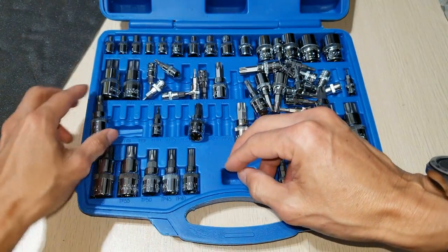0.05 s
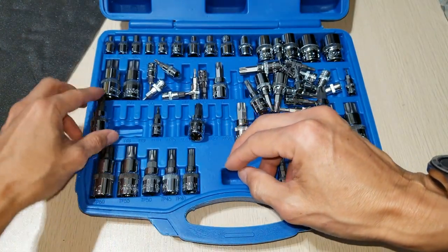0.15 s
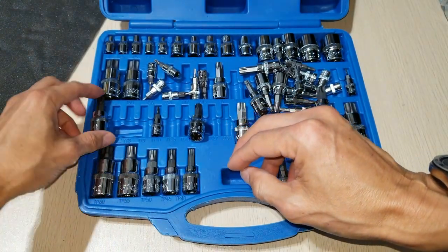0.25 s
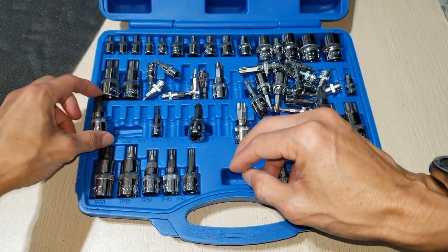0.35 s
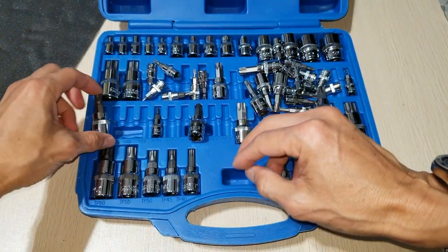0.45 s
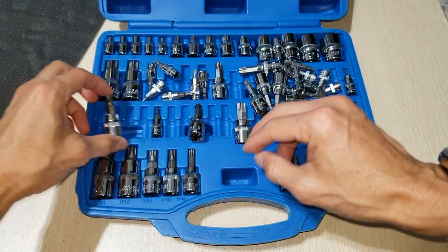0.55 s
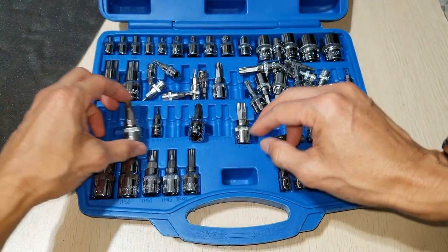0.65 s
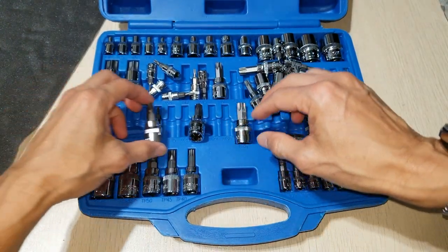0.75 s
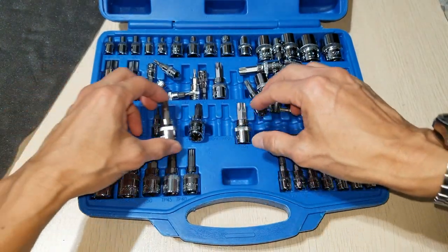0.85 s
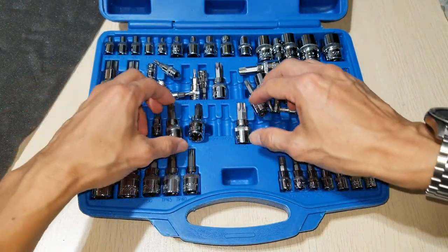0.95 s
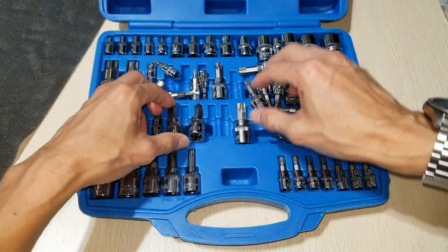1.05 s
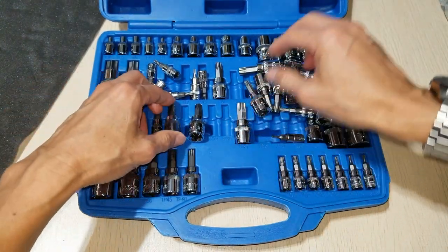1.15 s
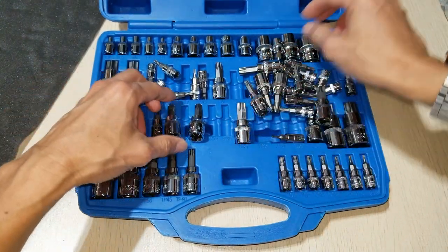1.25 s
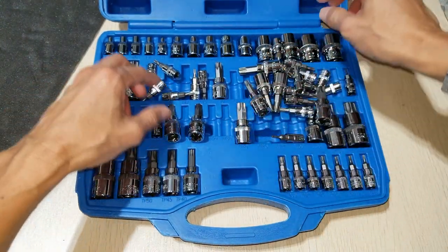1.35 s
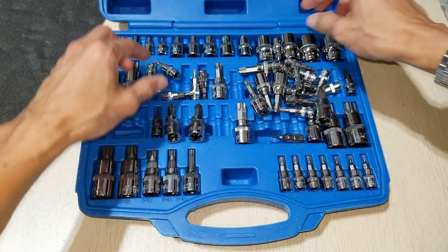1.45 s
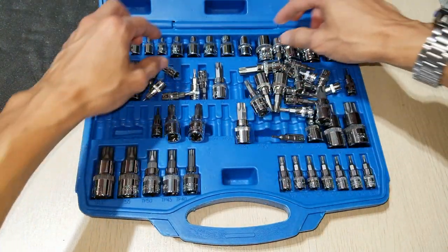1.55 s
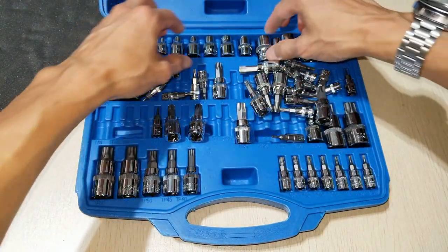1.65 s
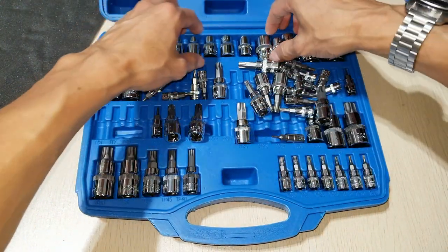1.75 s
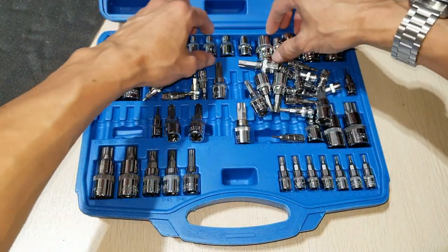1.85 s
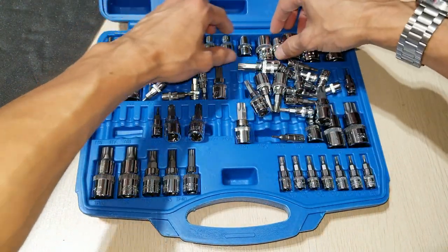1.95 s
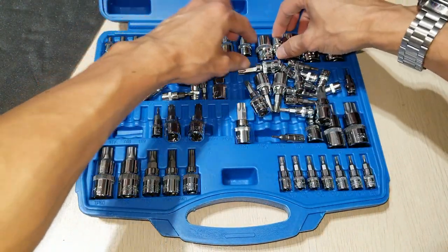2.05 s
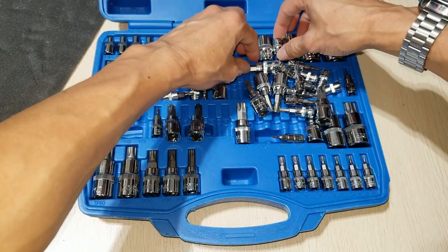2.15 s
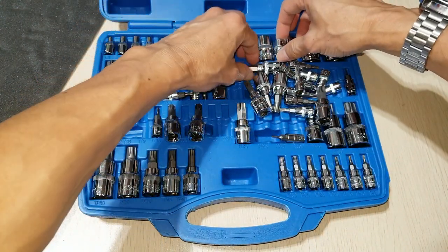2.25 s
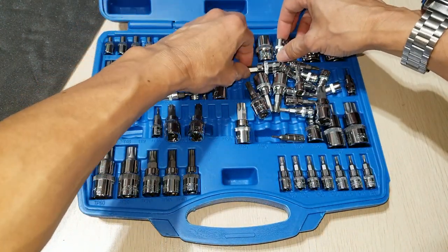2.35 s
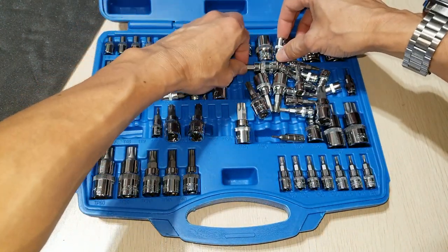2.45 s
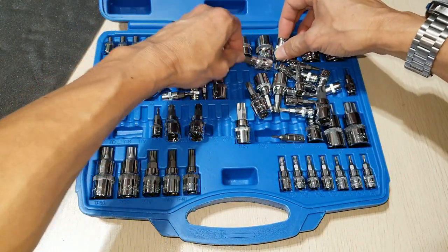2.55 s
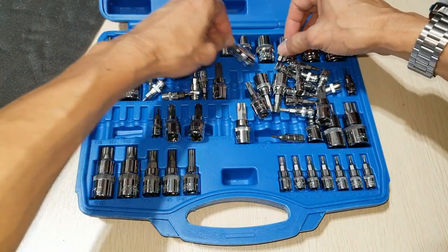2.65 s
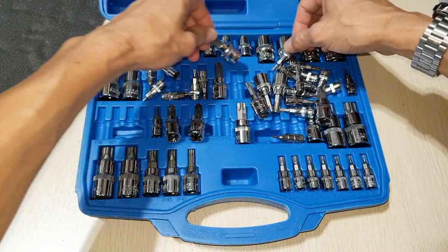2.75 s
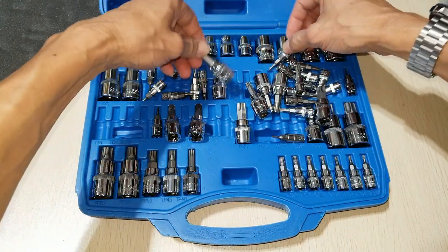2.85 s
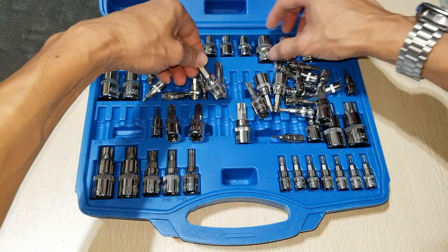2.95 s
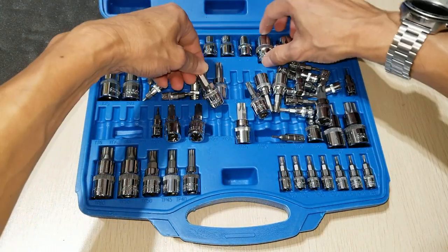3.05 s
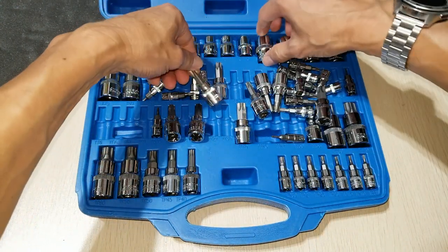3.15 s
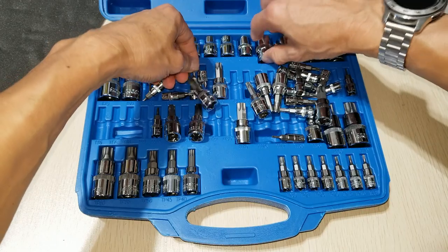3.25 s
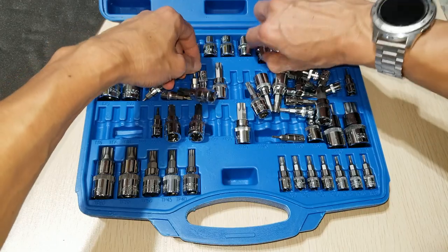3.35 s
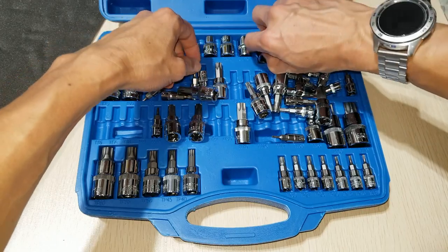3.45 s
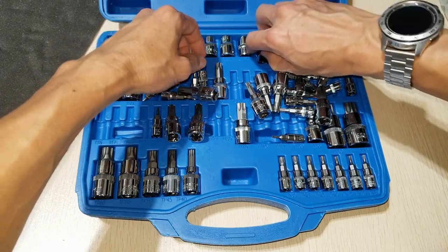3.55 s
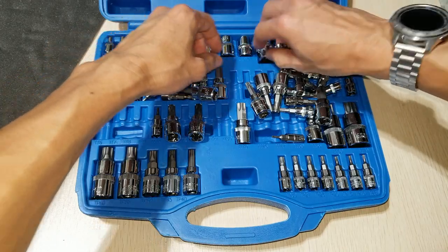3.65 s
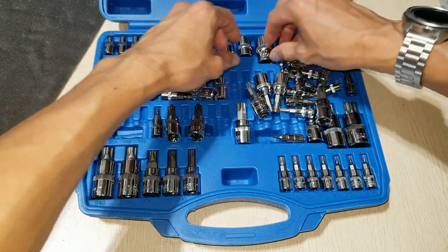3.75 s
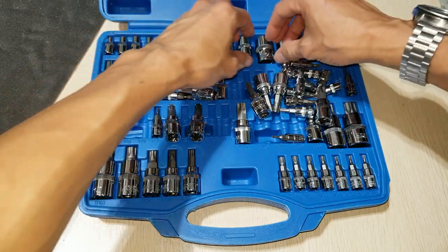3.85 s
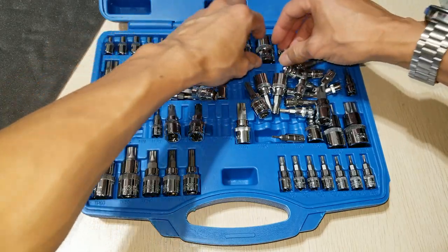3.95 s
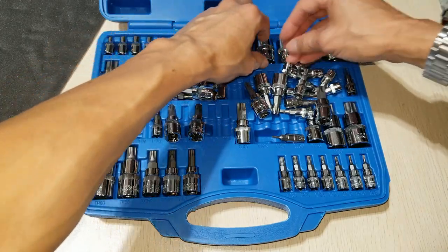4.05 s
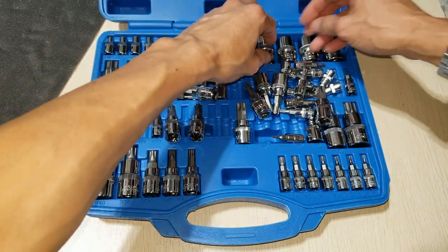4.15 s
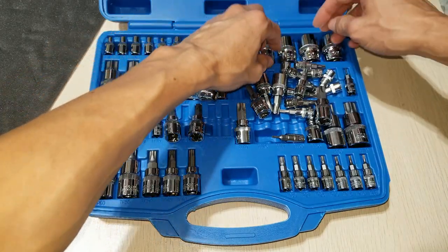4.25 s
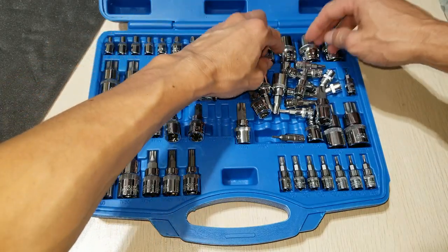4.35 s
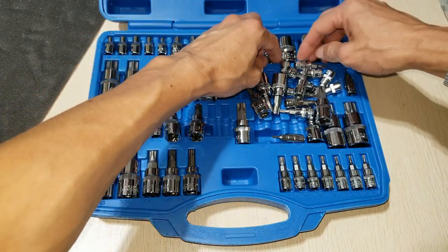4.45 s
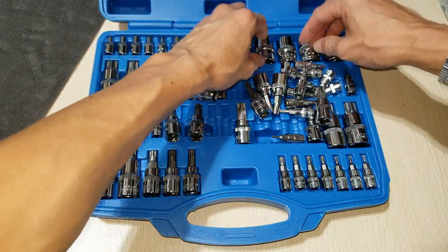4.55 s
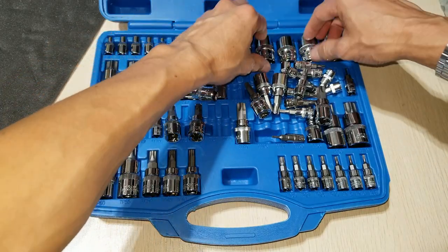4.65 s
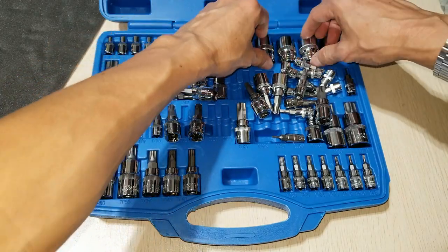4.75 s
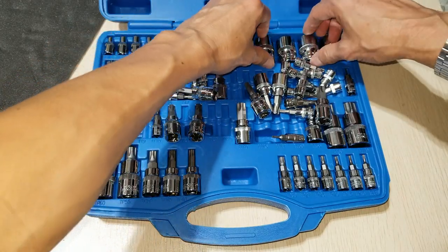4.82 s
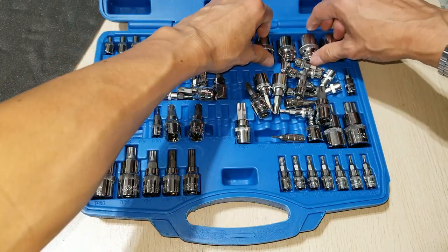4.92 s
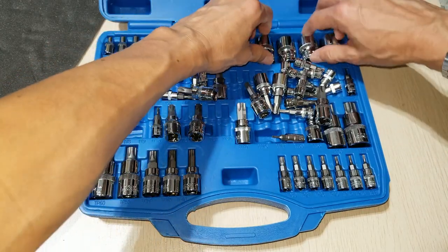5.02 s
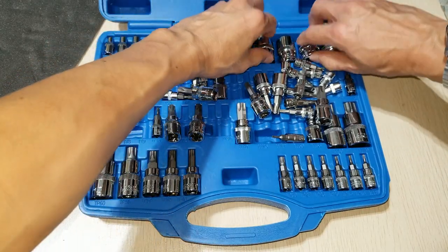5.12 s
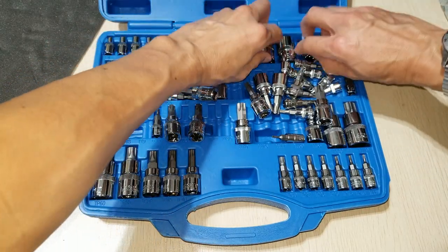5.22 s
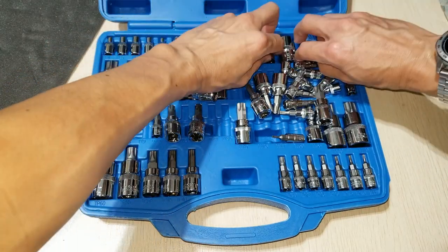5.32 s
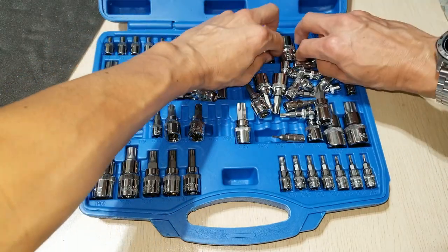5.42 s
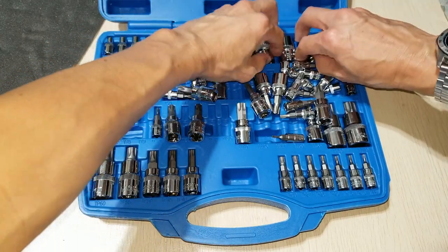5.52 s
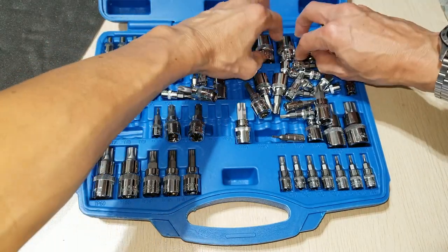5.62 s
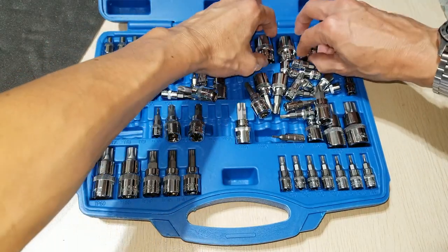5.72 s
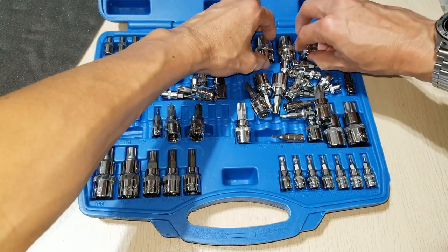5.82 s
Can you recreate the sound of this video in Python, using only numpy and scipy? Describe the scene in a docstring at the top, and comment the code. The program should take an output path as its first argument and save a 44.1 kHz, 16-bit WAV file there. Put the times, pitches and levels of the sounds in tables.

```python
"""Sorting steel sockets and bits in a plastic tool case

Two hands sort pieces in a moulded case on a table, heard close. Each contact is shaped noise in four bands
(table thump, tray knock, clack, tick) plus short partials; three small bits ring as very high sines.
Dragged or settling pieces chatter and rub as filtered noise, a finger slides over the plastic, a socket
squeaks, and decaying noise tails give a small room over soft hiss."""
import sys
import numpy as np
from scipy import signal
from scipy.fft import rfft, irfft, next_fast_len
from scipy.io import wavfile

SR = 44100
rng = np.random.default_rng(int(sys.argv[2]) if len(sys.argv) > 2 else 0)


def store_pcm(level_fs):
    """Save levels as 16-bit WAV."""
    pcm = np.round(np.clip(level_fs, -1, 1) * 32767).astype(np.int16)
    wavfile.write(sys.argv[1], SR, np.atleast_2d(pcm).T)


N = 259308
SIZE = 8192  # samples in one event or response
T = np.arange(SIZE) / SR
HZ = np.fft.rfftfreq(SIZE, 1 / SR)
NOW = np.arange(N) / SR


def amp(db):
    """dB to amplitude."""
    return 10 ** (np.asarray(db) / 20)


def unit(x):
    """Scale to rms 1."""
    return x / np.sqrt(np.mean(x ** 2) + 1e-20)


def noise_pair():
    """Two unrelated white noises."""
    return rng.standard_normal((2, N))


def along(points, hz):
    """(Hz, value) points read on a log frequency axis."""
    f, v = np.transpose(points)
    return np.interp(np.log(hz + 1), np.log(f + 1), v)


def swell(rows):
    """(s, dB) points as a gain for every sample, silent outside them."""
    s, db = np.transpose(rows)
    return amp(np.interp(NOW, s, db, left=-np.inf, right=-np.inf))


def fade(t60_s):
    """Exponential free decay, 60 dB in t60_s."""
    return np.exp(-np.log(1000) * T / t60_s)


def onset(rise_s):
    """Exponential rise with time constant rise_s."""
    return 1 - np.exp(-T / rise_s)


def add(track, s, sound):
    """Mix a sound in at a time."""
    part = track[:, max(round(s * SR), 0):][:, :sound.shape[1]]
    part += sound[:, :part.shape[1]]


def peaks(modes):
    """Power response of a set of resonances."""
    return sum(amp(db) ** 2 / (1 + (2 * (HZ - hz) / width) ** 2) for hz, width, db in modes)


# Resonances of the loaded case. Each row: frequency in Hz, width in Hz, level in dB above its dense modes.
CASE_MODES = [(81.4, 8.2, 16), (137.9, 20, 10), (412.4, 41, 9.5), (523, 110, 9), (696, 25, 5.5),
              (940, 30, 7.5), (1039, 74, 4.5), (1172, 95, 6), (1926, 244, 8), (2077, 70, 1.5),
              (2860, 150, -0.5), (3800, 51, -8), (4063, 47, 4), (6560, 750, 4)]


def through_case(spectrum):
    """Causal (minimum-phase) response of the case to a force with this spectrum."""
    magnitude = amp(along(spectrum, HZ)) * np.sqrt(1 + peaks(CASE_MODES))
    cepstrum = irfft(np.log(magnitude))
    # folding the cepstrum onto positive time makes the response causal
    cepstrum[1:SIZE // 2] *= 2
    cepstrum[SIZE // 2 + 1:] = 0
    return np.exp(rfft(cepstrum))


# Stereo likeness. Each row: frequency in Hz, left-right correlation (1 = identical).
LIKENESS = [(60, .95), (280, .99), (550, .91), (1100, .68), (2200, .25), (5000, .04)]
# Stereo balance. Each row: frequency in Hz, left over right in dB.
LEFT_OVER_RIGHT = [(60, 5.5), (300, 3.5), (700, 3.5), (2500, 4), (5000, -1), (9000, 5.5)]


def ports(pair, response):
    """Two unrelated spectra become left and right: alike in the bass, mostly louder on the left."""
    turn = np.arccos(np.clip(along(LIKENESS, HZ), -1, 1)) / 2
    lean = amp(np.outer([.5, -.5], along(LEFT_OVER_RIGHT, HZ)))
    mid = pair[..., :1, :] * np.cos(turn)
    side = pair[..., 1:, :] * np.sin(turn)
    return np.concatenate([mid + side, mid - side], axis=-2) * lean * response


def sustained(force, response):
    """A lasting pair of forces heard through a response, at rms 1."""
    paths = irfft(ports(np.eye(2)[:, :, None], response))
    paths = np.roll(paths, SIZE // 2, axis=-1)
    heard = signal.oaconvolve(force[:, None], paths, axes=-1).sum(axis=0)
    return unit(heard[:, SIZE // 2:][:, :N])


def pings(times, gains, count, low_hz, high_hz, t60_s, octave_db):
    """Held in fingers or seats, pieces give a few short partials, different at every touch."""
    track, t = np.zeros((2, N)), T[:SIZE // 2]
    shape = (fade(t60_s) * onset(0.00044))[:len(t)]
    for s, gain in zip(times, gains):
        hz = low_hz * (high_hz / low_hz) ** rng.random((count, 1))
        ring = np.sin(2 * np.pi * (hz * t + rng.random((2, count, 1))))
        ring = ring * amp(octave_db * np.log2(hz / low_hz))
        add(track, s, gain * ring.sum(axis=1) * shape)
    return track


# Spectrum of the room and microphone hiss. Each row: frequency in Hz, level in dB.
QUIET_SPECTRUM = [(15, -22), (25, -10.5), (59, -3.5), (178, -8.5), (281, -11), (1080, -18), (1900, -15),
                  (2630, -19), (8580, -30.5), (10900, -15), (15500, -22.5)]


def background(level_db=-59, hiss_hz=1900, hiss_width_hz=350, hiss_db=6):
    """A quiet room: steady shaped noise with a soft mid-range hiss."""
    hiss = np.sqrt(0.5 + peaks([(hiss_hz, hiss_width_hz, hiss_db)]))
    return amp(level_db) * sustained(noise_pair(), amp(along(QUIET_SPECTRUM, HZ)) * hiss)


# Finger slide over textured plastic. Each row: time in seconds, level in dB.
SLIDE_LEVEL = [(.36, -71.5), (.46, -48), (.54, -44.5), (.68, -50), (.75, -74.5)]
# Spectrum of the slide. Each row: frequency in Hz, level in dB.
SKIN_SPECTRUM = [(35, -48), (60, -30), (123, -9.5), (175, -25.5), (403, -3.5), (773, -23.5), (869, -14),
                 (1200, -26), (1550, -14.5), (3420, -28.5), (15500, -23)]


def finger_slide():
    """Skin on textured plastic: smooth friction as shaped noise."""
    return swell(SLIDE_LEVEL) * sustained(noise_pair(), amp(along(SKIN_SPECTRUM, HZ)))


# Socket pulled along its seat. Each row: time in seconds, level in dB.
PULL_LEVEL = [(2.44, -67.5), (2.5, -50), (2.62, -56), (2.655, -34.5), (2.68, -61)]
# Resonances of the squeak. Each row: frequency in Hz, width in Hz, level in dB.
SQUEAK_MODES = [(2900, 63, 0), (6900, 220, -5.5)]


def socket_squeak():
    """Friction on the seat, as noise through two narrow resonances."""
    return swell(PULL_LEVEL) * sustained(noise_pair(), np.sqrt(peaks(SQUEAK_MODES)))


# Strokes that drag a piece over tray and neighbours.
# Each row: start in seconds, end in seconds, push at the start in dB, push at the end in dB.
STROKES = [(1.79, 1.993, -55, -43.5), (2.05, 2.28, -32, -26.5), (2.825, 2.982, -33.5, -21),
           (3.249, 3.382, -25.5, -28.5), (3.46, 3.495, -32.5, -33), (3.724, 3.906, -39, -23),
           (3.975, 4.098, -41.5, -38), (4.32, 4.452, -49.5, -48), (4.745, 5.045, -51.5, -48.5),
           (5.048, 5.259, -21, -29.5), (5.298, 5.358, -38, -34.5), (5.838, 5.884, -31, -28)]
# Soft swell into each strike, and rattle after it: dB against the clack, t60.
SWELL_DB, SWELL_T60_S = -14, .035
SETTLE_DB, SETTLE_T60_S = -13, .22


def pushing(attack_s=.011, release_s=.014, settle_rise_s=.012):
    """Drive of the friction: in each stroke, with a soft swell into each contact and a rattle after it."""
    push = np.zeros((1, N))
    for start, end, start_db, end_db in STROKES:
        gate = np.clip((NOW - start) / attack_s, 0, 1) * np.exp(-np.maximum(NOW - end, 0) / release_s)
        push += gate * amp(np.interp(NOW, [start, end], [start_db, end_db]))
    lead_in = fade(SWELL_T60_S)[SIZE // 2::-1]  # reversed decay softens the start of the strike
    settling = fade(SETTLE_T60_S) * onset(settle_rise_s)
    for (s, *_), db in zip(CONTACTS, part_db(CLACK_LAW)):
        add(push, s - len(lead_in) / SR, amp(db + SWELL_DB) * lead_in[None])
        add(push, s, amp(db + SETTLE_DB) * settling[None])
    return push[0]


# Hard chatter fed into the case. Each row: frequency in Hz, level in dB.
CHATTER_FORCE = [(60, -22.5), (200, -6.5), (700, -12.5), (1900, 0.5), (3500, -7.5), (8000, -22),
                 (15000, -23)]
# Light rubbing fed into the case. Each row: frequency in Hz, level in dB.
RUB_FORCE = [(100, -10.5), (600, -10), (1400, -0.5), (2500, -0.5), (6000, -13.5), (15000, -22.5)]


def drags(slips_per_s=260, spread_db=3, slip_t60_s=0.026, bed=0.3, catch_db=-37,
          rub_db=-1, chatter_db=-2.0, ping_db=-3):
    """Lightly pushed steel rubs; pushed harder it catches and slips, and more of the slips ping."""
    push = pushing()
    catching = push ** 2 / (push ** 2 + amp(catch_db) ** 2)
    slip_gain = amp(spread_db * np.clip(rng.standard_normal(N), -2, 2))
    slips = (rng.random(N) < slips_per_s / SR) * slip_gain
    grip = np.sqrt(np.abs(signal.oaconvolve(slips ** 2, fade(slip_t60_s) ** 2)[:N]))
    chatter = sustained(noise_pair() * (unit(grip) + bed), through_case(CHATTER_FORCE))
    rub = sustained(noise_pair() * (unit(grip) + 2), through_case(RUB_FORCE))
    hard_part = amp(chatter_db) * np.sqrt(catching) * chatter
    light_part = amp(rub_db) * np.sqrt(1 - catching) * rub
    hard = (slips > 0) & (rng.random(N) < np.sqrt(catching))
    slip_pings = pings(NOW[hard], amp(ping_db) * (slips * push)[hard], count=1,
                       low_hz=1502, high_hz=4690, t60_s=0.052, octave_db=-2.5)
    return push * (hard_part + light_part) + slip_pings


# Steel striking a bit. Each row: time in seconds, bit name, level in dB.
CLINKS = [(1.604, "low", -28.5), (1.623, "low", -22), (1.683, "low", -20.5), (1.729, "low", -25.5),
          (2.34, "low", -27.5), (2.41, "middle", -24), (2.882, "middle", -19), (3.061, "middle", -24.5),
          (3.196, "low", -0.5), (3.302, "low", -18), (3.38, "middle", -17.5), (3.769, "high", -22),
          (3.817, "high", -15.5), (3.973, "middle", -23.5), (5.208, "high", -16)]
# Bits that ring. Each entry: bit name, pitch in Hz, t60 in seconds.
BITS = {"low": (12480, 0.16), "middle": (12950, 0.072), "high": (13110, 0.062)}
HOP_S, HOP_LOSS_DB = .03, 11.5  # longest flight, loss at each hop


def clinks(room_db=-9, room_t60_s=0.32, side_db=3.0, spread_hz=60, strikes=3):
    """Each bit rings at its own pitch, again at every hop; narrow-band noise adds fluttering reflections."""
    track = np.zeros((2, N))
    for s, bit, db in CLINKS:
        hz, t60_s = BITS[bit]
        band = 1 / (1 + ((HZ - hz) / spread_hz) ** 2)
        flutter = unit(irfft(rfft(rng.standard_normal((2, SIZE))) * band))
        echo = flutter * fade(np.sqrt(t60_s * room_t60_s)) * onset(0.0028)
        add(track, s, amp(db + room_db) * echo)
        for hop in range(strikes):
            phase = rng.uniform(0, 2 * np.pi) + np.array([[0], [np.pi / 2]])
            ring = np.sin(2 * np.pi * hz * T + phase) * fade(t60_s) * onset(.0007)
            add(track, s, amp(db - hop * HOP_LOSS_DB) * ring)
            s += HOP_S * rng.uniform(.5, 1)
    return track * amp([[side_db], [-side_db]])  # left up, right down


def own_colours(slopes_db_per_octave):
    """Gain against frequency for each contact: a slope, and random bumps of the spot that was struck."""
    octaves = np.log2(np.hypot(HZ, 300) / 300)
    knots = np.arange(0, 7, .22)  # octaves
    bumps_db = 2.8 * rng.standard_normal((len(slopes_db_per_octave), len(knots)))
    return amp([np.clip(slope, -6, 6) * octaves + np.interp(octaves, knots, bump)
                for slope, bump in zip(slopes_db_per_octave, bumps_db)])


LEAD_S = .003  # silence in front of each blow


def blows(times, levels_db, slopes, spectrum, rise_s, first_t60_s, body_db, body_t60_s, room_db, room_t60_s):
    """One band of every contact: noise decaying as the blow, the tray's shudder and the room."""
    decay = fade(first_t60_s) + amp(body_db) * fade(body_t60_s) + amp(room_db) * fade(room_t60_s)
    shape = np.interp(T - LEAD_S, T, decay * onset(rise_s))
    force = rng.standard_normal((len(times), 2, SIZE)) * shape
    sounds = irfft(ports(rfft(force) * own_colours(slopes)[:, None], through_case(spectrum)))
    sounds = sounds * np.clip((T[-1] - T) / .06, 0, 1) ** 2  # taper to silence
    track = np.zeros((2, N))
    for s, db, sound in zip(times, levels_db, sounds):
        # 0 dB: the energy of 10 ms at rms 1
        add(track, s - LEAD_S, amp(db) * unit(sound) * np.sqrt(.01 * SR / SIZE))
    return track


USUAL_STRENGTH_DB = -25


def part_db(law):
    """Level of one part of every contact, linear in the strength and hardness of the blow."""
    _, strength, hardness, _ = np.transpose(CONTACTS)
    usual_db, per_strength, per_hardness = law
    return usual_db + per_strength * (strength - USUAL_STRENGTH_DB) + per_hardness * hardness


# Each row: time in seconds, strength in dB, hardness in dB (below 0 steel on plastic, above 0 on steel),
# weight in dB (how much presses through to the table).
CONTACTS = [(0.104, -57, -9, 8), (0.223, -35, -7.5, -5), (0.242, -35.5, -9, -11), (0.905, -25, -3.5, -3.0),
            (1.015, -25.5, -5, -6.0), (1.041, -26, -5, -10), (1.062, -30, -7.5, -3), (1.149, -48.5, -7, 6),
            (1.606, -33, 21.5, 1.0), (1.622, -23, 5, -1.5), (1.685, -37.5, 22.5, -8),
            (1.727, -30.0, 19, -6), (1.962, -37.5, 21.5, -11), (1.979, -39, -3.5, -4),
            (2.131, -27, -0.5, -19.0), (2.152, -22, 2.5, -8), (2.178, -10.0, -6.5, -11.5),
            (2.186, -14.5, -6, -12), (2.211, -20, -13.5, -5), (2.342, -44.0, 29, -8),
            (2.41, -34.5, 13.5, 2), (2.665, -12.5, 1.5, -10), (2.688, -19, -5.0, -13),
            (2.817, -29.0, 11.5, -33.0), (2.883, -13.5, -4, -17), (2.915, -21, 5.5, -8.0),
            (2.979, -21.0, -2.5, -4.5), (3.061, -23.5, 4.5, -5), (3.155, -23.0, -8, 0.5),
            (3.196, -15.5, -2, -14), (3.302, -20.5, 3.0, -6.5), (3.38, -23.5, 0, -10.5),
            (3.577, -22.5, -2, -2.5), (3.602, -20.5, -1.5, -4), (3.618, -17, -9, -27),
            (3.626, -13.5, -8.0, -40), (3.637, -13.5, -11.5, -17), (3.77, -24.0, 9.5, -22),
            (3.82, -18.5, 5, -11), (3.84, -17.5, -3.5, -12.5), (3.973, -27.5, 8.5, -15),
            (4.049, -27.5, 3, -19), (4.072, -41, 13, -7), (4.096, -32.0, 2.5, -22.5),
            (4.131, -45.5, 3.5, -14.5), (4.299, -50.5, -6.5, 11.5), (4.367, -45.5, -9, 4),
            (4.517, -47, -13.5, 6), (4.615, -35.0, 7.5, -3.5), (4.642, -24.0, 9, -8.5),
            (4.686, -32, 3.5, -6), (4.892, -38.5, 0.5, 3), (4.981, -36.5, -9.5, 2),
            (5.048, -29.5, 15.5, -15.0), (5.085, -29.5, 23.5, -22), (5.113, -30.5, 11.5, -7),
            (5.209, -24, 7.5, -25), (5.232, -18, 0, -16), (5.378, -25, -2.5, -6.0), (5.595, -25, -13, -1),
            (5.603, -17.0, -6, -9.5), (5.659, -29.0, 5.5, -1.0), (5.707, -33, -10.5, -3.0),
            (5.878, -38.5, 15, -8.0)]
# How a part follows the blow. Each law: dB at the usual strength, dB per dB of strength, dB per dB of hardness.
KNOCK_LAW = (-24, 0.99, -.51)
CLACK_LAW = (-25.5, .9, .41)
TICK_LAW = (-36, 1.2, 0.56)
# Force each part feeds into the case. Each row: frequency in Hz, level in dB.
THUMP_FORCE = [(20, -38.5), (50, -8.5), (90, -11), (170, 3), (270, 1), (380, -4.5), (900, -76)]
KNOCK_FORCE = [(120, -34), (290, -16), (420, -3), (1300, -0.5), (1700, 0), (4000, -40)]
CLACK_FORCE = [(500, -48), (1100, -10.5), (1500, -3.5), (2700, 1.5), (4300, -10.5), (5600, -15.5),
               (11000, -57.5)]
TICK_FORCE = [(2000, -24), (4000, -7), (4900, 2.5), (9000, -0.5), (12500, 0), (16000, -16.5)]


def contacts(knock_lean=0.44, clack_lean=0.38, usual_knock_db=3, usual_tick_db=-11, ping_db=-7.5):
    """Weight drives the table, soft landings the tray, hard edges clack and tick; hardness tilts knock and clack."""
    s, strength, _, weight = np.transpose(CONTACTS)
    knock, clack, tick = map(part_db, (KNOCK_LAW, CLACK_LAW, TICK_LAW))
    flat = np.zeros(len(s))
    knock_slope = knock_lean * (clack - knock + usual_knock_db)
    clack_slope = clack_lean * (tick - clack - usual_tick_db)
    steel = amp((clack + tick) / 2 + ping_db)
    table_thump = blows(s, strength + weight, flat, THUMP_FORCE, rise_s=0.0072, first_t60_s=0.04,
                        body_db=1.5, body_t60_s=0.21, room_db=-23.5, room_t60_s=.3)
    tray_knock = blows(s, knock, knock_slope, KNOCK_FORCE, rise_s=0.0003, first_t60_s=0.011,
                       body_db=-14.5, body_t60_s=0.067, room_db=-16.0, room_t60_s=0.13)
    edge_clack = blows(s, clack, clack_slope, CLACK_FORCE, rise_s=0.00032, first_t60_s=0.0093,
                       body_db=-12, body_t60_s=0.13, room_db=-18, room_t60_s=0.2)
    edge_tick = blows(s, tick, flat, TICK_FORCE, rise_s=0.00041, first_t60_s=0.011,
                      body_db=-18, body_t60_s=0.051, room_db=-13.5, room_t60_s=0.19)
    steel_pings = pings(s, steel, count=5, low_hz=2370, high_hz=8200, t60_s=0.087, octave_db=-5)
    return table_thump + tray_knock + edge_clack + edge_tick + steel_pings


def scene():
    """Everything on the table, over the room."""
    return background() + finger_slide() + socket_squeak() + drags() + clinks() + contacts()


TOP_HZ = 15700


def record(dry):
    """Peaks beyond full scale clip; nothing is kept above the band limit."""
    size = next_fast_len(N + SIZE)
    keep = np.fft.rfftfreq(size, 1 / SR) < TOP_HZ
    return irfft(rfft(np.clip(dry, -1, 1), size) * keep, size)[:, :N]


dry = scene()
out = record(dry)
store_pcm(out)
```